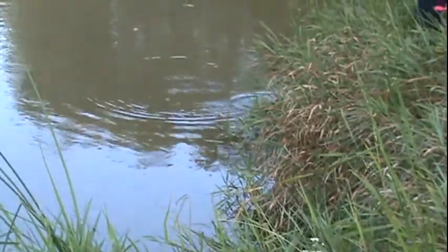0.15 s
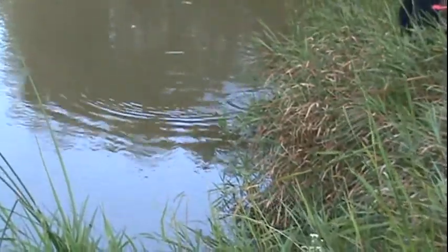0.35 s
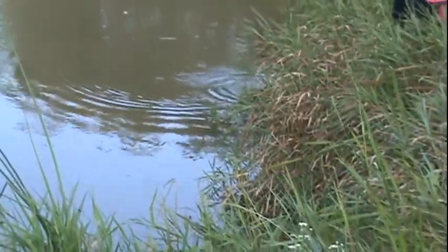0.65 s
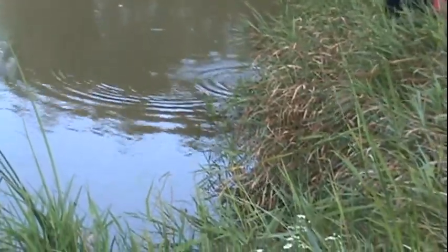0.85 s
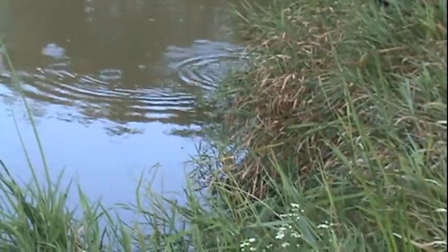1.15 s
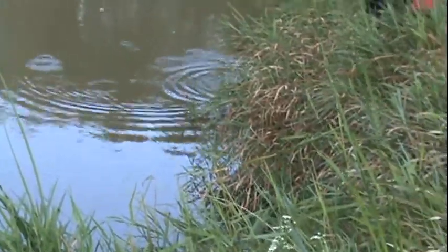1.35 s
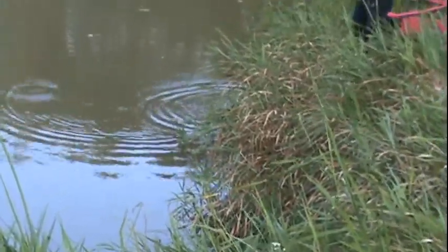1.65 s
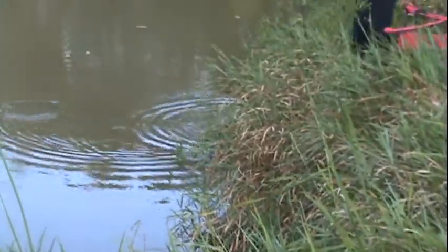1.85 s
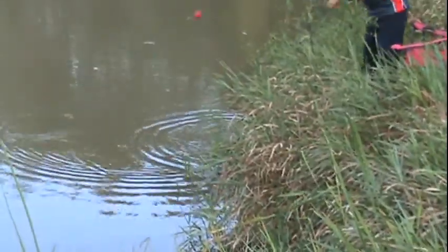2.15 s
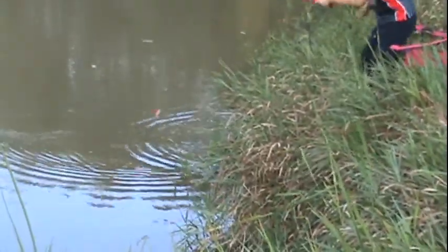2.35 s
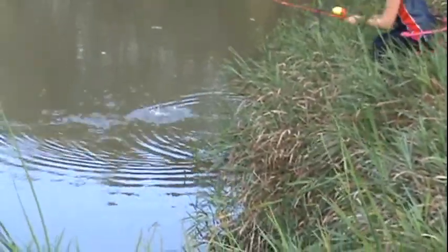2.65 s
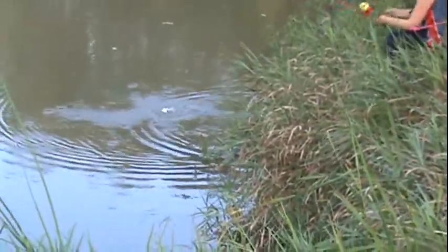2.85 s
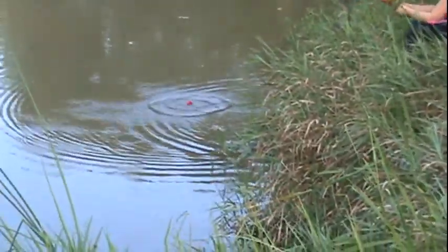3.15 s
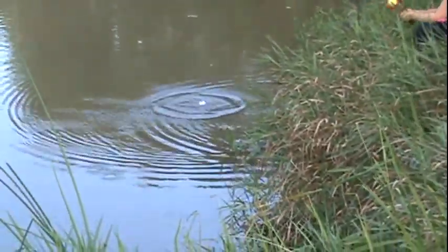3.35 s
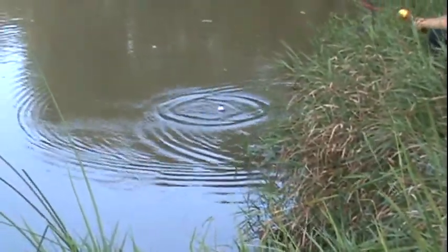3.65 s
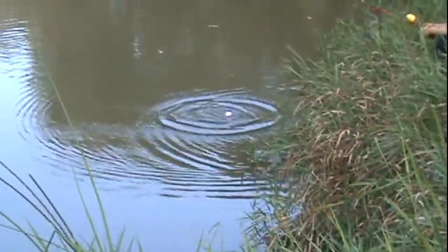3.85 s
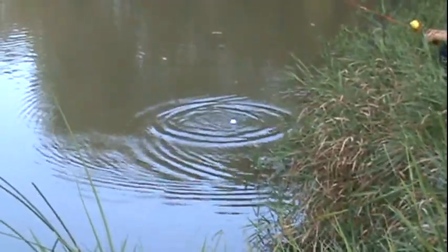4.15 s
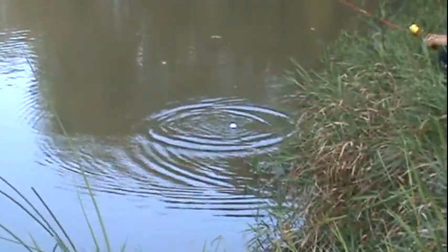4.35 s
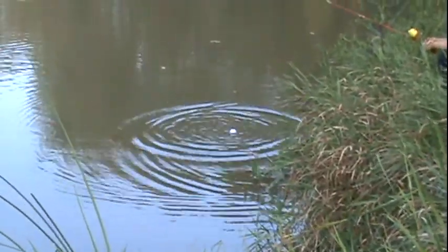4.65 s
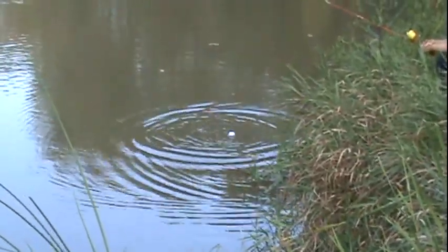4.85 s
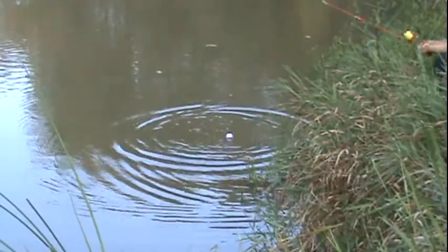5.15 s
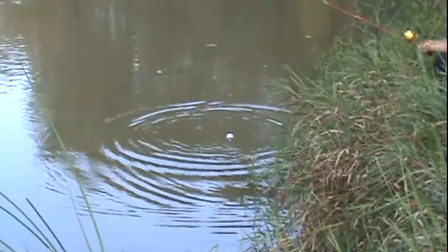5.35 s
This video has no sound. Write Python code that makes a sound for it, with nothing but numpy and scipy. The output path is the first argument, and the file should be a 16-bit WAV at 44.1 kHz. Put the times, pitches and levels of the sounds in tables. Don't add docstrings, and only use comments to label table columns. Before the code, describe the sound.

Wind rumbles and slaps a small camera microphone over a steady high insect drone, with one nasal bird rasp and a fishing float plopping into water.

```python
import sys
import numpy as np
from scipy import signal
from scipy.fft import rfft, irfft, next_fast_len
from scipy.io import wavfile
from scipy.ndimage import uniform_filter1d

SR = 44100
rng = np.random.default_rng(int(sys.argv[2]) if len(sys.argv) > 2 else 0)


def invert_db(level):
    return 10 ** (np.asarray(level, dtype=float) / 20)


def master_out(mix):
    frames = np.transpose(np.atleast_2d(mix))
    ceiling = np.clip(frames, -1, 1)
    pcm = np.round(ceiling * 32767).astype(np.int16)
    wavfile.write(sys.argv[1], SR, pcm)


N = 243431


def level(x, db=0):
    return x * invert_db(db) / np.sqrt(np.mean(x ** 2))


def curves(table):
    start_s, *columns = np.transpose(table)
    return [np.interp(np.arange(N) / SR, start_s, c) for c in columns]


def humps(rows):
    t = np.arange(N) / SR
    return sum(height * np.exp(-((t - s) / half_s) ** 2) for s, height, half_s in rows)


def slope(hz, points):
    freq_hz, level_db = np.transpose(points)
    return np.interp(np.log(hz + 1), np.log(freq_hz), level_db)


def shape(x, gain):
    size = next_fast_len(N)
    return irfft(rfft(x, size) * gain(np.fft.rfftfreq(size, 1 / SR)), size)[..., :N]


def walk(rate_hz):
    k = int(SR / rate_hz)
    held = np.repeat(rng.standard_normal(N // k + 1), k)
    return 0.86 * uniform_filter1d(uniform_filter1d(held, k), k)[:N]


def clicks(rate_hz, scatter_db):
    hit = rng.random((2, N)) < rate_hz / SR
    return hit * rng.standard_normal((2, N)) * invert_db(scatter_db * rng.exponential(size=(2, N)))


def ports(mid, side):
    return np.array([mid + side, mid - side])


def add(out, at_s, sound):
    i = int(at_s * SR)
    out[:, i:i + sound.shape[1]] += sound[:, :N - i]


# start_s, rumble_db, left_minus_right_db
GUST = [(0, -37.5, -1), (.3, -34.5, 1.5), (.58, -32, 5), (.7, -33.5, -1), (.95, -34.5, 4.5),
        (1.2, -27.5, 0.5), (1.45, -31.5, -2.5), (1.7, -35, -2), (2.15, -36, 2), (2.45, -47, 3),
        (2.8, -42, 2), (3.25, -42.5, 0), (3.57, -48.5, 5), (4.05, -32, 0.5), (4.45, -36.5, 3),
        (4.8, -33, -5), (5.2, -37, 3.5), (5.52, -39.5, -1)]
# peak_s, rise_db, half_s
PUFFS = [(.14, 6.5, 0.015), (.43, 5.5, 0.043), (.575, 13.5, 0.047), (.82, 6, .03), (1.29, 2.5, .04),
         (1.51, 8, 0.017), (1.63, 0, 0.02), (1.95, 5, 0.051), (2.04, 9.5, 0.013), (2.12, 2.5, 0.022),
         (2.38, 5.5, 0.039), (4.36, 4, .02), (2.64, 1, 0.017), (3.33, 12, 0.016), (3.92, 1.5, 0.02),
         (4.07, 4, 0.034), (4.57, 4.5, 0.029), (4.745, 7, .03), (4.92, 14.5, 0.068), (5.03, 7, 0.016),
         (5.3, 5.5, 0.025), (5.47, 12.5, 0.027)]
# freq_hz, level_db_per_hz
RUMBLE = [(12, -39), (20, 0), (33, 2), (93, -5), (178, -22), (250, -30.5), (320, -41), (550, -120)]
# freq_hz, side_db
RUMBLE_SIDE = [(20, -1), (50, -7), (100, -5.5), (200, -2)]
# freq_hz, level_db_per_hz
BUFFET = [(60, -5.5), (130, 3.5), (250, -9.5), (500, -27), (1000, -26), (2000, -95)]


def wind():
    steady_db, pan_db = curves(GUST)
    puff_db = humps(PUFFS)
    rumble_db = steady_db + puff_db
    buffet_db = -8 - 0.56 * puff_db + 2.75 * walk(12)
    pan_db = pan_db + 4 * walk(14)
    apart_db = 2 + 0.46 * (rumble_db + 36)
    noise = rng.standard_normal((4, N))

    mid = shape(noise[0], lambda f: invert_db(slope(f, RUMBLE)))
    side = shape(noise[1], lambda f: invert_db(slope(f, RUMBLE) + slope(f, RUMBLE_SIDE)))
    rumble = ports(mid, side) / np.std(mid) * invert_db(rumble_db + 2.96 * walk(18))
    rumble = rumble * invert_db(np.array([[-1.2], [1.2]]))

    mid, side = level(shape(noise[2:], lambda f: invert_db(slope(f, BUFFET))))
    mid = mid * invert_db(-4.5 + 0.63 * walk(40))
    side = side * invert_db(apart_db + 2.4 * walk(40))
    buffet = ports(mid, side) * invert_db(rumble_db + buffet_db)
    return (rumble + buffet) * invert_db(0.53 * np.array([pan_db, -pan_db]) / 2)


# peak_s, peak_db, half_s
BURSTS = [(0.251, -25, 0.013), (0.424, -30, 0.0085), (.457, -19, 0.01), (0.549, -12, 0.0098),
          (0.587, -16, 0.015), (0.692, -13, 0.012), (.74, -15, 0.012), (0.782, -16, 0.0081),
          (0.805, -18.5, 0.011), (4.742, -11.5, 0.011), (4.78, -26, .01), (4.869, -19.5, 0.0069),
          (4.924, -16.5, 0.017), (4.944, -18, 0.0094), (4.967, -20, .008), (4.992, -17, 0.0075),
          (5.024, -39, 0.0067)]


def bursts():
    spectrum = [(40, -20), (85, 5.5), (160, -6), (300, -15.5), (600, -35), (1500, -60.5)]  # Hz, dB
    swell = humps((s, invert_db(db - 7.0), half_s) for s, db, half_s in BURSTS)
    swirl = shape(rng.standard_normal(N), lambda f: invert_db(slope(f, spectrum)))
    swirl = swirl / np.sqrt(uniform_filter1d(swirl ** 2, size=900))
    return ports(swell * swirl, np.zeros(N))


# peak_s, peak_db, width_ms, port (left 1, right -1)
POPS = [(0.25, -19, 1.8, -1.3), (0.418, -14, 1.9, -1.2), (0.453, -13, 1.5, -1.35), (0.461, -9.5, 1.5, 0.89),
        (0.529, -20, 1.7, 1), (0.534, -19, 2, 1), (0.551, -3, 0.65, 0.48), (0.573, -6, 1.3, 1),
        (0.585, -14, 2, 0.97), (0.593, -5, 1.6, 0.72), (0.682, -27, 1.8, 1), (0.688, -15, 1.5, 1),
        (0.696, -11.5, 1.7, -0.88), (0.734, -15, 2.2, -0.75), (0.745, -10, 1.8, 0.73),
        (0.789, -17, 0.81, 0.54), (0.803, -27, 2, -0.89), (0.815, -14, 1.3, -1), (1.208, -17, 2.2, -0.61),
        (1.237, -25, 1.7, -1), (1.393, -17, 1.6, 1), (1.52, -17, 2.8, -0.67), (4.745, -7, 1.15, -0.42),
        (4.869, -25, 2.0, -1), (4.92, -18, 1.5, -1), (4.925, -7, 1.3, -1.2), (4.943, -19, 1.6, -0.86),
        (4.969, -9.5, 1.7, 0.61)]


def pops():
    out = np.zeros((2, N))
    half_n = 600
    t_ms = np.arange(-half_n, half_n) / SR * 1e3
    for (s, db, width_ms, port), luck in zip(POPS, rng.random((len(POPS), 1))):
        spike = 1 / (1 + (2 * t_ms / width_ms) ** 2) ** 1.1
        broad = np.exp(-(t_ms / (3.2 * width_ms)) ** 2)
        rebound = np.exp(-(t_ms / 10.8) ** 2)
        rebound = rebound / rebound.sum()
        side = spike - rebound * spike.sum()
        mid = .24 * (broad - rebound * broad.sum()) + .15 * side
        sign = np.sign(luck - .5)
        add(out, s - half_n / SR, sign * invert_db(db + 1.5) * ports(port * mid, side))
    return out


# start_s, pitch_hz, level_db, beak_hz
RASP = [
    (1.29, 236, -59, 4000),
    (1.325, 244, -50, 4200),
    (1.355, 253, -48.5, 4500),
    (1.39, 267.5, -46, 4330),
    (1.46, 270, -44.5, 4160),
    (1.495, 251, -47.5, 3950),
    (1.555, 243, -48.5, 3870),
    (1.595, 211, -51, 3650),
    (1.655, 178, -62, 3550),
]
# freq_hz, width_hz, level_db
THROAT = [(1080, 200, -16), (1370, 200, -2), (1830, 260, -7), (3100, 1300, -10)]
# share_of_beak_hz, width_hz, level_db
BEAK = [
    (.58, 300, -8),
    (1, 680, -1.5),
    (1.15, 600, -5),
]


def bird():
    pitch_hz, level_db, beak_hz = curves(RASP)
    t = np.arange(N) / SR
    settle_s = 1.355
    rough = .05 + .75 / (1 + np.exp((t - settle_s) / .01))
    rough = rough + .1 * np.clip((250 - pitch_hz) / 60, 0, 1) * (t > settle_s)
    phase = 2 * np.pi * np.cumsum(pitch_hz * (1 + .08 * rough * walk(300))) / SR
    closing_db = np.clip((4400 - beak_hz) / 18, 0, 20)
    tone = 0
    for k in range(3, 26):
        harmonic_hz = k * pitch_hz
        tract = sum(invert_db(db) / (1 + (2 * (harmonic_hz - hz) / width_hz) ** 2) for hz, width_hz, db in THROAT)
        for share, width_hz, db in BEAK:
            peak = invert_db(db + 7 * rough - closing_db * (.15 + .85 * (share > 1)))
            tract = tract + peak / (1 + (2 * (harmonic_hz - share * beak_hz) / width_hz) ** 2) ** 1.5
        tone = tone - tract * np.cos(k * phase + 0.043 * k * k)
    hoarse = uniform_filter1d(rng.standard_normal(N), size=24) * 5
    gate = np.clip((t - RASP[0][0]) / 0.0085, 0, 1) * np.clip((RASP[-1][0] - t) / 0.012, 0, 1)
    dry = tone * (1 - rough + rough * hoarse) * gate * invert_db(level_db + 5.0)

    tail = rng.standard_normal((2, 9000)) * np.exp(-np.arange(9000) / SR / .05)
    tail = tail / np.sqrt(np.sum(tail[0] ** 2))
    echo = signal.fftconvolve(dry[None], tail, axes=1)[:, :N]
    return ports(dry, .36 * np.roll(dry, 5)) + invert_db(-11) * echo


# start_s, peak_db, pitch_hz, t60_s, glide_up_share
PLOPS = [(2.5838, -26, 1250, 0.016, 0.083), (2.5955, -30, 684, 0.078, 0.019), (2.603, -32.5, 392, 0.098, 0),
         (2.6005, -19.5, 1705, 0.016, 0.077), (2.601, -35, 1060, 0.036, 0.058), (2.607, -37, 1930, .03, 0),
         (2.628, -40, 1760, .03, .05), (2.908, -37, 506, 0.04, 0.052), (2.910, -48, 1200, .015, 0),
         (2.980, -41, 924, 0.054, 0.021), (3.075, -43, 2050, 0.037, 0), (2.983, -34.5, 1800, .035, 0.2)]


def float_in_water():
    out, t = np.zeros((2, N)), np.arange(6000) / SR
    pan_db = 3
    for s, db, hz, t60_s, glide in PLOPS:
        ring = np.sin(2 * np.pi * hz * t * (1 + glide * t / t60_s))
        ring = ring * invert_db(db - 60 * t / t60_s) * np.minimum(t / 0.0014, 1)
        add(out, s, np.outer(invert_db(np.array([pan_db, -pan_db]) / 2), ring))
    return out


# start_s, level_db, decay_s
SPLASH = [
    (2.597, -36, 0.012),
    (2.906, -44.5, 0.02),
]


def splash():
    spectrum = [(150, -32), (350, 1), (1900, -0.5), (2400, -15), (8000, -23)]  # Hz, dB
    out, t = np.zeros((2, N)), np.arange(4000) / SR
    for (s, db, decay_s), hiss in zip(SPLASH, rng.standard_normal((len(SPLASH), 2, len(t)))):
        add(out, s, invert_db(db + 13.0) * hiss * (t / 0.0026).clip(0, 1) * np.exp(-t / decay_s))
    mid, side = shape(out, lambda f: invert_db(slope(f, spectrum)))
    return ports(mid, 0.49 * side)


# start_s, pitch_hz, level_db
LINE = [(2.522, 1450, -64), (2.535, 1680, -56), (2.55, 1810, -55), (2.575, 1870, -56), (2.592, 1800, -64)]


def line():
    pitch_hz, level_db = curves(LINE)
    t = np.arange(N) / SR
    tone = np.sin(2 * np.pi * np.cumsum(pitch_hz * (1 + .02 * walk(150))) / SR)
    return np.sqrt(2) * invert_db(level_db) * tone * (t > LINE[0][0]) * (t < LINE[-1][0])


# start_s, level_db
SWAY = [(0, -47.5), (.4, -52.5), (1.1, -51.5), (2.3, -48), (2.5, -51.5), (2.8, -51), (3.84, -48.5),
        (4.3, -49), (4.6, -53), (5.52, -50)]
# peak_s, rise_db
FLURRIES = [(.17, 6), (.31, 7), (.445, 8), (.935, 4), (1.108, 6), (2.555, 6), (3.29, 4), (4.33, 6),
            (4.83, 5)]
# freq_hz, level_db_per_hz
GRASS = [(6000, -16.5), (8000, -11.5), (9000, -4.5), (9800, -0.5), (11500, -3.5), (13500, -13.5),
         (14800, -14), (15700, -4.5)]
# freq_hz, level_db_per_hz
GRASS_SIDE = [(6000, -34), (8100, -21), (9300, -13), (10200, -5), (11000, 2.5), (12100, 7), (13200, 1),
              (14300, -10), (15100, -14), (15250, -60)]


def grass():
    flurry_half_s = 0.014
    flurry_db = curves(SWAY)[0] + humps((s, db, flurry_half_s) for s, db in FLURRIES)
    flurry_db = flurry_db + 0.66 * walk(13) + 1.85 * walk(85)
    mid, side = level(clicks(14000, .7)) * invert_db(np.outer([1, .75], flurry_db + 51) - 42)
    mid = shape(mid, lambda f: invert_db(-0.83 + slope(f, GRASS)))
    side = shape(side, lambda f: invert_db(slope(f, GRASS_SIDE)))
    return ports(mid, side) * invert_db(np.array([[.55], [-.55]]))


# start_s, peak_db, ring_hz
SNAPS = [(0.2972, -32, 9220), (0.447, -30, 10500), (0.645, -33, 8660), (0.928, -31, 9400),
         (1.1049, -35, 9590), (2.5348, -22, 9370), (2.56, -30, 9700), (2.6, -35, 9970),
         (2.9547, -36, 10600), (3.091, -34, 9700), (3.28, -35, 9600), (3.972, -31, 9300),
         (4.198, -36, 9930), (4.817, -37, 11000), (5.02, -33, 10100)]


def snaps():
    spectrum = [(1500, -24), (3000, -7), (5500, -4), (9500, -2.5), (13000, -11), (15500, -11)]  # Hz, dB
    out, t = np.zeros((2, N)), np.arange(2000) / SR
    fade = .5 * np.exp(-t / 0.0024) + 0.43 * np.exp(-t / 0.007)
    for (s, db, hz), hiss in zip(SNAPS, rng.standard_normal((len(SNAPS), 2, len(t)))):
        ring = 0.82 * np.sin(2 * np.pi * hz * t) * np.array([[1], [.3]]) * np.exp(-t / 0.0025)
        add(out, s + .0007, invert_db(db) * np.minimum(t / 0.00051, 1) * (hiss * fade + ring))
    mid = shape(out[0], lambda f: invert_db(slope(f, spectrum)))
    side = shape(out[1], lambda f: invert_db(slope(f, GRASS_SIDE) - 6))
    return ports(mid, side)


# pitch_hz, width_hz, level_db, side_db
SONGS = [
    (2536, 218, -13.5, -9),
    (2882, 280, -10, -7),
    (3714, 490, -12, -6.5),
    (6678, 650, -1, -12),
]


def chorus():
    out = 0
    for hz, width_hz, db, side_db in SONGS:
        mid, side = shape(clicks(20000, 0.14), lambda f: np.exp(-((f - hz) / width_hz) ** 2))
        song = ports(mid, side * invert_db(side_db)) / np.std(mid)
        out = out + song * np.sqrt(width_hz) * invert_db(db + 0.96 * walk(5))
    out[1] = .6 * out[1] + .36 * np.roll(out[1], 1)
    return level(out, -39.5 + 1.65)


# freq_hz, level_db_per_hz
AIR = [(100, -11.5), (250, -4), (500, -1.5), (1000, -6.5), (1900, -8), (3200, -10), (5000, -4),
       (8000, -9.5), (12000, -18.5)]
# freq_hz, level_db_per_hz
AIR_SIDE = [(100, -22), (250, -10), (500, -3), (1000, -7), (1900, -10), (3200, -15.5), (5000, -13),
            (8000, -15.5), (12000, -20)]


def air():
    mid, side = rng.standard_normal((2, N))
    mid = shape(mid, lambda f: invert_db(slope(f, AIR)))
    side = shape(side, lambda f: invert_db(slope(f, AIR_SIDE)))
    return level(ports(mid, side)) * invert_db(-54.5 + 9 + .5 * walk(3.2))


# pitch_hz, level_db
WHINE = [(12291, -72), (13296, -78), (14301, -83)]


def whine():
    t = np.arange(N) / SR
    return sum(np.sqrt(2) * invert_db(db) * np.sin(2 * np.pi * hz * t) for hz, db in WHINE)


def scene():
    gusts = wind() + bursts() + pops()
    cast = float_in_water() + splash() + line()
    background = grass() + snaps() + chorus() + air() + whine()
    return gusts + bird() + cast + background


def low_pass(x):
    return signal.sosfilt(signal.butter(12, 16410, fs=SR, output="sos"), x)


def record(dry):
    top_hz = 15740
    clipped = np.clip(dry, -.98, .98)
    mix = shape(clipped, lambda f: f < top_hz)
    return low_pass(mix)


dry = scene()
out = record(dry)
master_out(out)
```